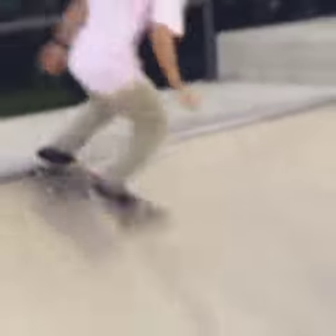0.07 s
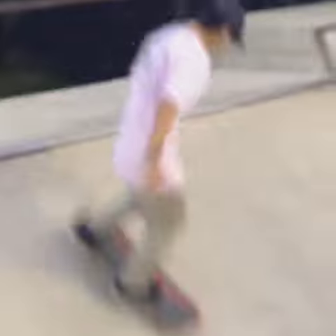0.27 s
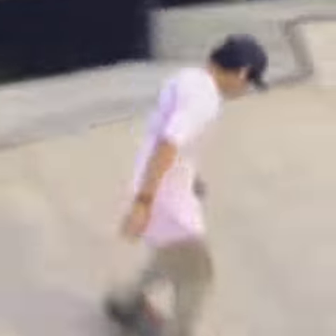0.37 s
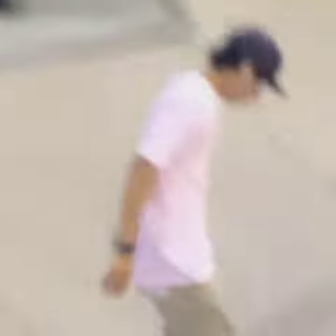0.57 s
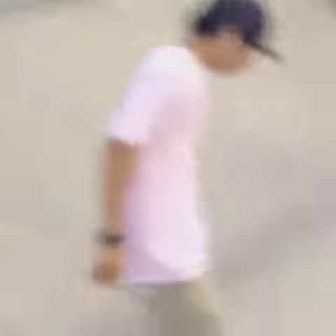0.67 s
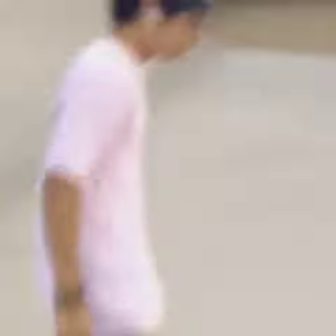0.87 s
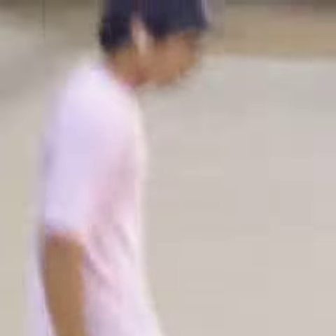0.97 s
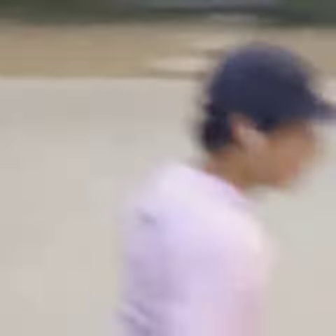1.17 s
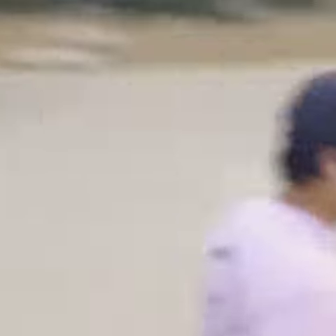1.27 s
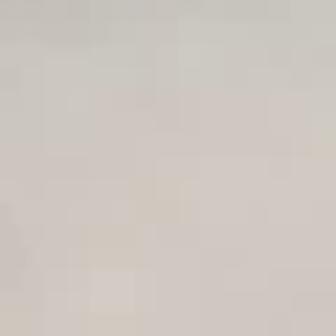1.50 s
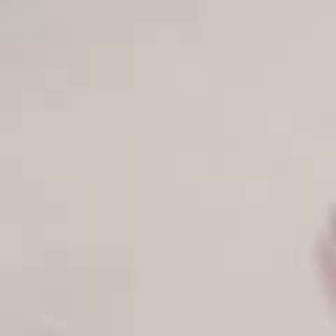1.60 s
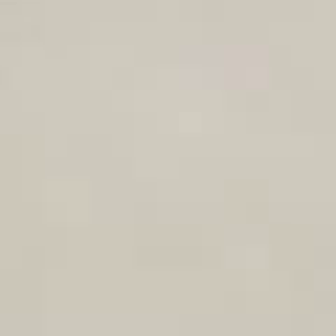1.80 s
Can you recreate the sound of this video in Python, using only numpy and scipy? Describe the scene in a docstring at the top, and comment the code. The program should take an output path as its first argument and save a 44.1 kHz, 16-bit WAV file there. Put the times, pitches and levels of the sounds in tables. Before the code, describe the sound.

After a brief near-quiet, board and wheels smack down on concrete, followed by grainy rolling, a quick double clack at a seam, and lower rolling with small grit ticks, heard close by outdoors in mono.

```python
"""Skateboard down a concrete bank

A skateboard drops onto a concrete bank in an open skatepark, heard from close by. Wheels and deck slam
down in a quick cluster of blows, made of ringing modes and a burst of crunching noise. Then tiny random
impacts make the wheels roar. They clack across a joint at the foot of the bank and roll on over the flat,
with short noise bursts for ticking grit, a few scuffs and one squeak. A far-off town hums behind.
"""
import sys
import numpy as np
from scipy import signal
from scipy.fft import rfft, irfft, next_fast_len
from scipy.io import wavfile
from scipy.ndimage import uniform_filter1d

SR = 44100
rng = np.random.default_rng(int(sys.argv[2]) if len(sys.argv) > 2 else 0)


def master_out(mix):
    """Clip the mix to full scale and print it as 16-bit PCM to the path in sys.argv[1]."""
    frames = np.transpose(np.atleast_2d(mix))
    ceiling = np.clip(frames, -1, 1)
    pcm = np.round(ceiling * 32767).astype(np.int16)
    wavfile.write(sys.argv[1], SR, pcm)


N = 81585  # length in samples
T = np.arange(N) / SR  # time of every sample in seconds

# In every colour table, each row: frequency in Hz, relative level in dB per Hz.
# In every table of modes, each row: frequency in Hz, relative level in dB, time to fall 60 dB in seconds.

# Colour of the distant town.
TOWN_COLOUR = [(50, -19), (90, -17), (200, -3), (400, -8), (1500, -22.5), (3000, -8), (15000, -55)]
TOWN_DB, HUM_HZ, HUM_DB = -56.5, 117.5, -57.5
HUM_WANDER, HUM_WANDER_PER_S = 0.02, 5.4  # share of the pitch, speed of the wander

# Scatter from the ramps: time to fall 60 dB, level, and where its treble is cut.
PARK_T60_S, PARK_DB, PARK_CUT_HZ = 0.66, -30, 14500
PARK_DELAY_S = 0.015

# Colour of the low rumble of the ride.
RUMBLE_COLOUR = [(36, -31), (52, -3.5), (200, -6), (500, -50.5)]
# Loudness of the rumble. Each row: time in seconds, level in dB.
RUMBLE_LEVEL = [(0, -56.5), (.4, -56), (.75, -46.5), (1.15, -54.5), (1.85, -55.5)]

# A narrow hollow in the upper mids of the whole scene, drifting slowly in pitch.
# Each row: time in seconds, centre in Hz.
HOLLOW_CENTRE = [(.25, 2740), (.45, 2830), (1.1, 2760), (1.8, 2680)]
HOLLOW_WIDTH_HZ, HOLLOW_SHARE = 390, 0.77  # share of the band taken away
HOLLOW_BLOCK = 256  # samples

# Wheels scuff sideways. Each row: middle in seconds, half length in seconds, level in dB.
SCUFFS = [(.01, 0.0082, -45), (0.233, 0.018, -32), (0.27, 0.0082, -33.5), (0.912, 0.026, -48),
          (1.735, 0.026, -44.5)]
# Colour of the scuffs.
SCUFF_COLOUR = [(300, -2), (2300, 1.5), (3300, 1.5), (9000, -6.5), (15000, -16)]

# A wheel squeaks once.
SQUEAK_S, SQUEAK_HALF_S, SQUEAK_HZ, SQUEAK_DB = 1.228, 0.012, 2400, -45

# Grit snaps under a wheel. Each row: time in seconds, level in dB.
TICKS = [(.9140, -20.5), (0.9922, -26), (1.492, -21.5), (1.5158, -22), (1.7183, -19), (1.7313, -21),
         (1.748, -20), (1.7574, -23)]
# Colour of a snap of grit.
TICK_COLOUR = [(1500, -9), (3500, 4), (7000, -0.5), (11000, -4.5), (15000, -11)]
TICK_T60_S = 0.0086

# The wheels sing under load. Each row: time in seconds, level in dB.
SINGING_LEVEL = [(.3, -62.5), (.365, -46), (.48, -38.5), (.6, -52), (1.1, -65), (1.4, -43), (1.75, -58.5)]
# Modes of the singing wheels.
SINGING_MODES = [(1502, -0.95, 0.025), (1682, -1.1, 0.027)]
SINGING_WANDER, SINGING_WANDER_PER_S = 0.025, 6.86  # share of the pitch, speed of the wander

# Bumps in the concrete that jolt the rolling deck.
# Each row: time in seconds, level in dB, frequency in Hz.
BUMPS = [(0.563, -24.5, 712), (.586, -25, 703), (1.133, -31, 590), (1.193, -32, 553), (1.383, -29, 520),
         (1.4195, -22.5, 550), (1.66, -26.5, 425), (1.674, -30.5, 549)]
BUMP_RISE_S = 0.0022

# Loudness of the rolling parts.
# Each row: time in seconds, deck's roar in dB, wheels' rasp in dB, hiss in dB.
ROLLING_LEVEL = [(0, -68, -58, -59.5), (.21, -61, -57.5, -58.5), (.26, -37, -46, -42),
                 (.325, -45, -47.5, -53.5), (.40, -37.5, -51, -50), (.48, -35, -45.5, -47),
                 (.585, -33.5, -44.5, -46.5), (.62, -40, -41, -47.5), (.67, -39.5, -44, -49),
                 (.8, -42, -48, -50), (.92, -44.5, -49, -49), (1.02, -40.5, -47.5, -53),
                 (1.25, -37.5, -47.5, -50.5), (1.41, -38.5, -44, -49.5), (1.53, -36.5, -42.5, -49),
                 (1.675, -37, -45.5, -49), (1.71, -43.5, -43.5, -48.5), (1.85, -46, -50, -50.5)]
# Colour of the deck's roar on the bank.
ROAR_BANK = [(60, -27.5), (140, -11.5), (250, -7), (470, -5.5), (630, -2), (745, -4), (880, -13),
             (1200, -24)]
# Colour of the deck's roar on the flat.
ROAR_FLAT = [(60, -21), (130, -15), (230, -10.5), (335, -3.5), (400, -2.5), (495, 3.5), (610, 0),
             (790, -13), (1300, -34.5)]
# Colour of the wheels' rasp on the bank.
RASP_BANK = [(600, -15.5), (950, -4.5), (1180, -1.5), (1480, -1), (1690, -5.5), (1960, -2.5), (2270, -8),
             (2800, -19)]
# Colour of the wheels' rasp on the flat.
RASP_FLAT = [(600, -14.5), (950, 0), (1300, 1.5), (1650, -2), (2000, -3.5), (2400, -10), (2680, -29)]
# Colour of the hiss, on bank and flat alike.
HISS_COLOUR = [(1500, -6), (2350, -2), (2700, -2), (3150, 2.5), (4000, 1.5), (5800, -1), (7500, -8),
               (10000, -8), (12500, -14.5), (15000, -16.5)]
FLAT_FROM_S, FLAT_BY_S = 0.89, 1.107  # the colour moves from bank to flat between these times
GRAINS_PER_S, GRAIN_SPREAD_DB = 6000, 1.5
FLUTTER_PER_S, FLUTTER_DB = 53, 0.98
STEADY_S, STEADY_SHARE = 0.0254, 0.55  # averaging time, share of the surges evened out

# Low thuds as the rider's weight presses down. Each row: time in seconds, level in dB.
THUDS = [(0.647, -23.5), (1.523, -41), (1.592, -39)]
THUD_HZ, THUD_T60_S = 184, 0.081

# A wheel catches on the joint and rings. Each row: time in seconds, level in dB.
CATCHES = [(0.6261, -16.5), (.6302, -24)]
# Modes of the caught wheel.
WHEEL_MODES = [(1920, 4.5, 0.0038), (2170, -1, 0.019), (2460, 2.5, 0.0034), (4220, -13.5, 0.0062)]
# Modes of the dull knock as the wheel drops off the joint.
JOINT_KNOCK_MODES = [(620, 0, .013), (980, 0, .012)]
JOINT_KNOCK_S, JOINT_KNOCK_DB = 0.6403, -17

# Blows on the board. Each row: time in seconds, wooden deck in dB, trucks and wheels in dB,
# crunch of grit in dB.
BLOWS = [(0.231, -22.5, -8.5, -14.5), (0.2341, -22.5, -15, -15), (.2380, -10, -7.5, -10),
         (.2398, -10, -20, -26.5), (.2428, -14.5, -26, -15.5), (.2572, -20.5, -28, -29),
         (0.2774, -29.5, -24, -21.5), (.2835, -31.5, -29, -26.5), (.6265, -37, -36, -33.5),
         (0.6413, -39, -35, -33.5), (0.6473, -35, -28.5, -35)]
# Modes of the wooden deck.
DECK_MODES = [(190, -15, 0.13), (414, -11.5, 0.058), (523, -6, 0.055), (569, -9.5, 0.064), (617, -6, 0.062),
              (669, -8, 0.06), (760, -18, .025), (947, -16, 0.055)]
# Modes of the trucks (the axle mounts) and wheels.
TRUCK_MODES = [(1110, -10, .06), (1197, -14, 0.061), (1298, -13, 0.046), (1535, -5.5, 0.033),
               (1688, -3, 0.026), (2052, -21, 0.048), (2365, -8.5, 0.037), (3246, -17, 0.041),
               (4040, -15, 0.035), (4300, -17.5, 0.035)]
# Colour of the crunch.
CRUNCH_COLOUR = [(100, -16.5), (400, 14.5), (1500, 2), (2300, 1), (2750, -1), (3300, 2), (4400, -1.5),
                 (6000, -8), (10000, -10.5), (15000, -24)]
CRUNCH_T60_S, CRUNCH_TAIL_DB, CRUNCH_TAIL_T60_S = 0.024, -24, 0.13
BLOW_LOW_CUT_HZ = 160
VARY_DB = 0.7  # typical chance difference in how strongly a mode is struck

CUTOFF_HZ = 15500


def from_db(db):
    """Turn decibels into a gain."""
    return 10 ** (np.asarray(db) / 20)


def rms_one(x):
    """Scale a signal to an average power of 1."""
    return x / np.sqrt(np.mean(x ** 2) + 1e-20)


def in_time(rows):
    """Join the rows by straight lines and read each column at every sample."""
    seconds, *columns = np.transpose(rows)
    return [np.interp(T, seconds, column) for column in columns]


def colour(x, points):
    """Filter with the given spectrum and unit power gain, without any sound ahead of its cause."""
    size = 2 * next_fast_len(N)
    hz, db = np.transpose(points)
    octave = np.log2(np.maximum(np.arange(size // 2 + 1) * SR / size, 1))
    # Outside the table the level falls by a further 20 dB per octave.
    beyond = np.abs(octave - np.clip(octave, np.log2(hz[0]), np.log2(hz[-1])))
    gain = rms_one(from_db(np.interp(octave, np.log2(hz), db) - 20 * beyond))
    # Folding the cepstrum (the spectrum of the log gain) makes the filter respond only forward in time.
    cepstrum = irfft(np.log(gain + 1e-9))
    cepstrum[1:size // 2] *= 2
    cepstrum[size // 2 + 1:] = 0
    response = np.exp(rfft(cepstrum))
    return irfft(rfft(x, size) * response)[:N]


def drift(rate):
    """Smooth noise into a slow random wander of typical size 1."""
    r = np.exp(-2 * np.pi * rate / SR)
    noise = rng.standard_normal(2 * N)
    wander = signal.lfilter([1], [1, -2 * r, r * r], noise)
    return rms_one(wander[N:])  # the first half lets the filter settle


def clicks(times, db):
    """Put one single-sample click at each time."""
    out = np.zeros(N)
    places = np.clip(np.asarray(times) * SR, 0, N - 1).astype(int)
    np.add.at(out, places, from_db(db))
    return out


def ring(x, hz, t60):
    """Let each click set a dying sine ringing, as high as the click."""
    r = from_db(-60 / (t60 * SR))  # shrink per sample
    w = 2 * np.pi * hz / SR  # turn per sample
    return signal.lfilter([0, np.sin(w)], [1, -2 * r * np.cos(w), r * r], x + 1e-18)


def dying(t60):
    """Start at 1 and fall by 60 dB in t60 seconds."""
    return np.exp(-np.log(1000) * T / t60)


def strike(modes, times, db, polarity=-1):
    """Ring every mode at every blow; neighbours start opposed (polarity -1) or in step (near 1)."""
    chance = rng.standard_normal((len(times), len(modes)))
    out = np.zeros(N)
    for k, (hz, mode_db, t60) in enumerate(modes):
        hits = clicks(times, db + mode_db + VARY_DB * chance[:, k])
        out += polarity ** k * ring(hits, hz, t60)
    return out


def swells(rows):
    """Add up bell-shaped rises and falls."""
    return sum(from_db(db) * np.exp(-((T - s) / half) ** 2) for s, half, db in rows)


def grains():
    """Scatter the dense tiny impacts of wheels on rough concrete at random."""
    sizes = from_db(GRAIN_SPREAD_DB * np.minimum(rng.exponential(1, N), 4))
    signs = rng.choice([-1, 1], N)
    present = rng.random(N) < GRAINS_PER_S / SR
    return rms_one(sizes * signs * present)


def steadied(x):
    """Partly even out chance surges in loudness and set the power to 1."""
    power = uniform_filter1d(x ** 2, int(STEADY_S * SR)) + 1e-12
    return rms_one(x / power ** (STEADY_SHARE / 2))


def town():
    """Steady far-off noise with a hum that wavers in pitch."""
    hum_hz = HUM_HZ * (1 + HUM_WANDER * drift(HUM_WANDER_PER_S))
    hum = np.sqrt(2) * np.sin(2 * np.pi * np.cumsum(hum_hz) / SR)
    noise = colour(rng.standard_normal(N), TOWN_COLOUR)
    return from_db(TOWN_DB) * noise + from_db(HUM_DB) * hum


def park(x):
    """Surrounding ramps scatter the sound into a faint, dying tail of noise."""
    low_pass = signal.butter(2, PARK_CUT_HZ, fs=SR, output="sos")
    noise = signal.sosfilt(low_pass, rng.standard_normal(N))
    tail = noise * dying(PARK_T60_S) * (T > PARK_DELAY_S)
    tail = tail / np.sqrt(np.sum(tail ** 2))
    return from_db(PARK_DB) * signal.fftconvolve(x, tail)[:N]


def hollow(x):
    """Take most of a narrow band away; its centre moves block by block."""
    out, state = x.copy(), np.zeros(2)
    centre = in_time(HOLLOW_CENTRE)[0]
    for i in range(0, N, HOLLOW_BLOCK):
        block = slice(i, i + HOLLOW_BLOCK)
        b, a = signal.iirpeak(centre[i], centre[i] / HOLLOW_WIDTH_HZ, fs=SR)
        band, state = signal.lfilter(b, a, x[block], zi=state)
        out[block] -= HOLLOW_SHARE * band
    return out


def rumble():
    """Low noise of the ride that swells and fades."""
    return colour(rng.standard_normal(N), RUMBLE_COLOUR) * from_db(in_time(RUMBLE_LEVEL)[0])


def scuffs():
    """Sliding wheels make short gritty swells of tiny impacts."""
    return colour(swells(SCUFFS) * grains(), SCUFF_COLOUR)


def squeak():
    """A wheel gives one brief pure tone that swells and fades."""
    return swells([(SQUEAK_S, SQUEAK_HALF_S, SQUEAK_DB)]) * np.sin(2 * np.pi * SQUEAK_HZ * T)


def ticks():
    """Grit cracks in tiny bright bursts of noise."""
    burst = dying(TICK_T60_S)
    burst = burst / np.sqrt(np.sum(burst ** 2))
    cracks = signal.fftconvolve(clicks(*np.transpose(TICKS)), burst)[:N]
    return colour(cracks * rng.standard_normal(N), TICK_COLOUR)


def singing():
    """The rough surface keeps two wheel resonances ringing; they wander in pitch as the load shifts."""
    rings = sum(from_db(db) * rms_one(ring(grains(), hz, t60)) for hz, db, t60 in SINGING_MODES)
    # Reading the sound a little faster or slower bends its pitch.
    bent_time = T + np.cumsum(SINGING_WANDER * drift(SINGING_WANDER_PER_S)) / SR
    return from_db(in_time(SINGING_LEVEL)[0]) * rms_one(np.interp(bent_time, T, rings))


def bumps():
    """A soft wheel rides over each bump: the deck's tone swells and dies within a few cycles."""
    out = np.zeros(N)
    for s, db, hz in BUMPS:
        age = np.maximum(T - s, 0)
        swell = age / BUMP_RISE_S * np.exp(1 - age / BUMP_RISE_S)
        out += from_db(db) * swell * np.sin(2 * np.pi * hz * age)
    return out


def rolling():
    """Grains drive deck and wheels, fluttering with the load; the colour drops from bank to flat."""
    roar_db, rasp_db, hiss_db = in_time(ROLLING_LEVEL)
    flat = np.clip((T - FLAT_FROM_S) / (FLAT_BY_S - FLAT_FROM_S), 0, 1)
    out = colour(rng.standard_normal(N) * from_db(hiss_db), HISS_COLOUR)
    parts = ((roar_db, ROAR_BANK, ROAR_FLAT), (rasp_db, RASP_BANK, RASP_FLAT))
    for level_db, on_bank, on_flat in parts:
        for share, spectrum in ((1 - flat, on_bank), (flat, on_flat)):
            # The square root keeps the power steady while one colour fades into the other.
            out += from_db(level_db) * np.sqrt(share) * steadied(colour(grains(), spectrum))
    return out * from_db(FLUTTER_DB * drift(FLUTTER_PER_S))


def knocks():
    """A wheel catches on the joint and drops off it with a dull knock; the rider's weight thuds."""
    catch = strike(WHEEL_MODES, *np.transpose(CATCHES))
    drop = strike(JOINT_KNOCK_MODES, [JOINT_KNOCK_S], JOINT_KNOCK_DB)
    thuds = ring(clicks(*np.transpose(THUDS)), THUD_HZ, THUD_T60_S)
    return catch + drop + thuds


def blows():
    """Landing and joint: deck and trucks ring while grit is crushed; a high-pass thins the bass."""
    s, deck_db, truck_db, crunch_db = np.transpose(BLOWS)
    burst = dying(CRUNCH_T60_S) + from_db(CRUNCH_TAIL_DB) * dying(CRUNCH_TAIL_T60_S)
    crush = signal.fftconvolve(clicks(s, crunch_db), burst)[:N]
    crunch = colour(crush * rng.standard_normal(N), CRUNCH_COLOUR)
    deck = strike(DECK_MODES, s, deck_db, polarity=0.98)
    trucks = strike(TRUCK_MODES, s, truck_db)
    high_pass = signal.butter(2, BLOW_LOW_CUT_HZ, "high", fs=SR, output="sos")
    return signal.sosfilt(high_pass, deck + trucks + crunch)


def scene():
    """Add the board, its scatter and the town in mono, then carve the hollow."""
    ride = rumble() + rolling() + bumps() + singing()
    details = scuffs() + squeak() + ticks()
    board = ride + details + knocks() + blows()
    return hollow(town() + park(board) + board)[None]


def record(dry):
    """Round off the loudest peaks and cut the highest treble."""
    low_pass = signal.ellip(10, 0.1, 80, CUTOFF_HZ, fs=SR, output="sos")
    return signal.sosfilt(low_pass, np.tanh(dry))


dry = scene()
out = record(dry)
master_out(out)
```